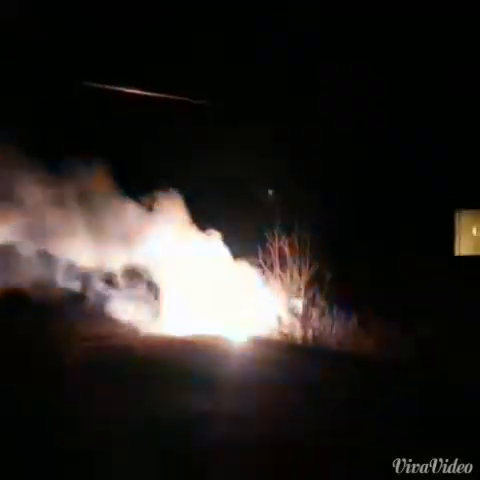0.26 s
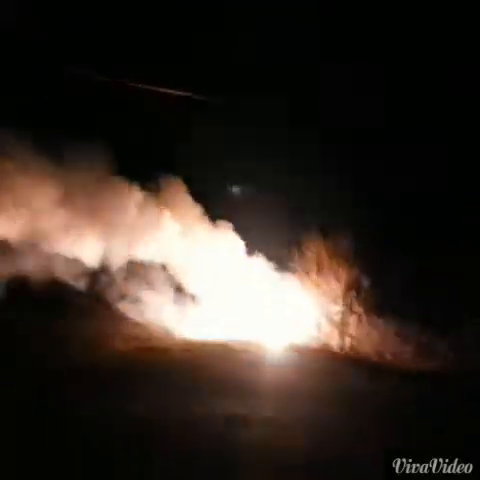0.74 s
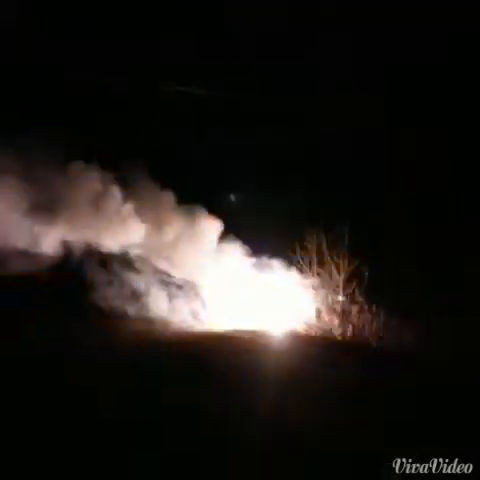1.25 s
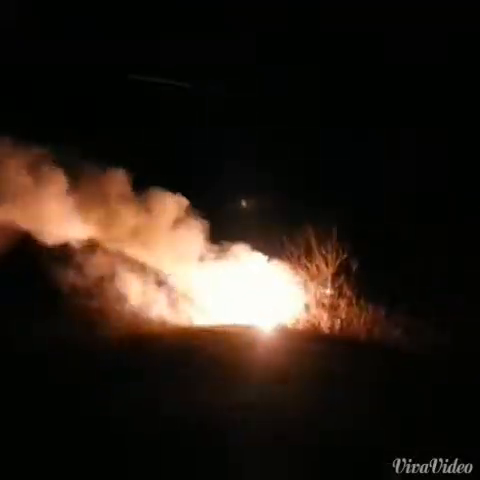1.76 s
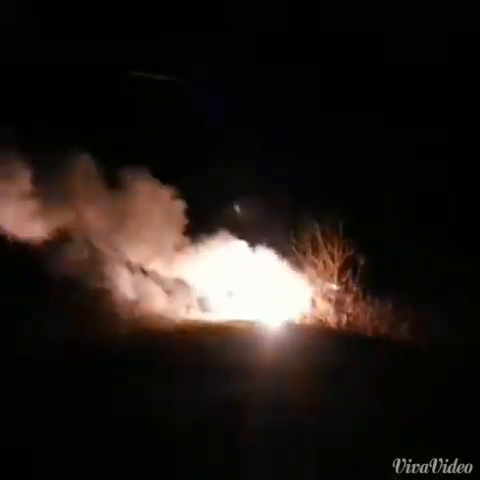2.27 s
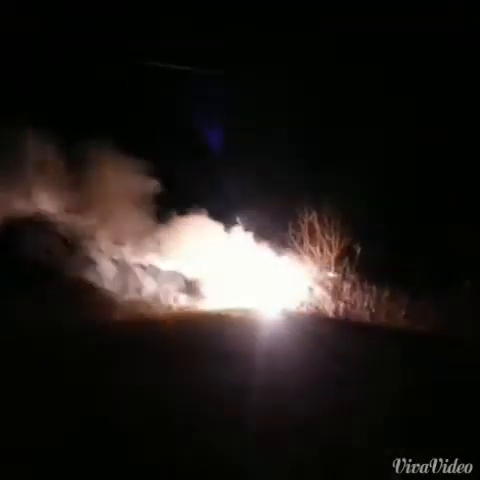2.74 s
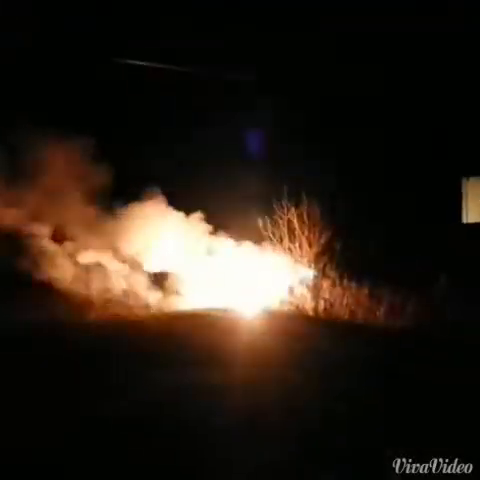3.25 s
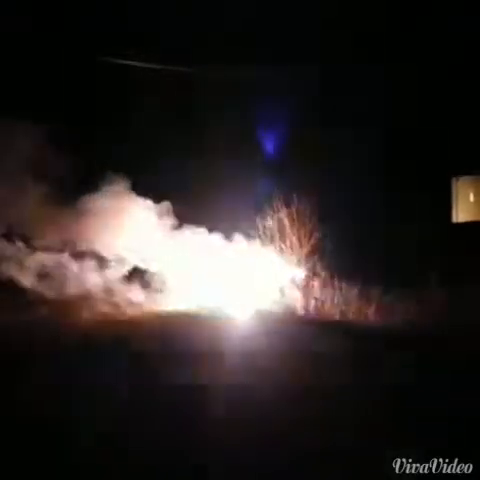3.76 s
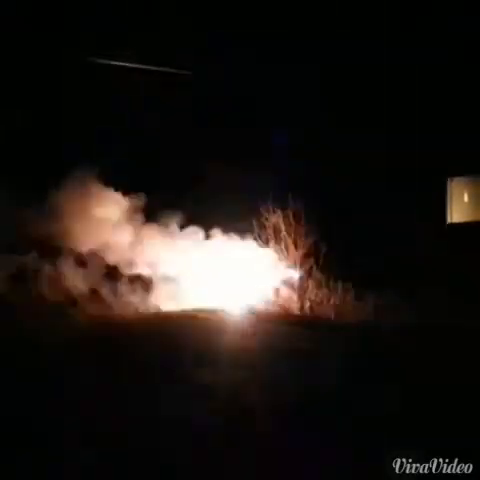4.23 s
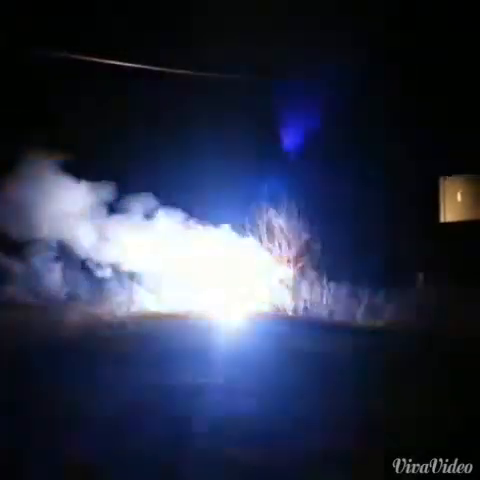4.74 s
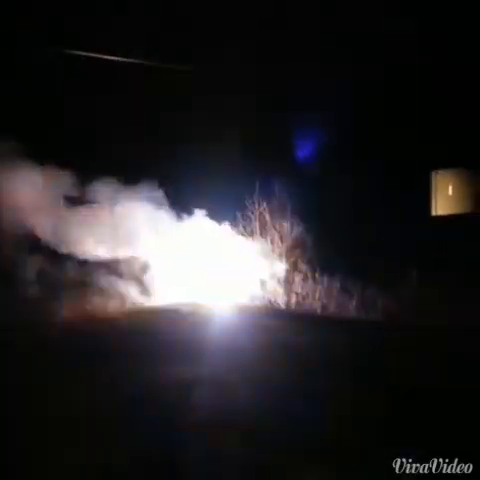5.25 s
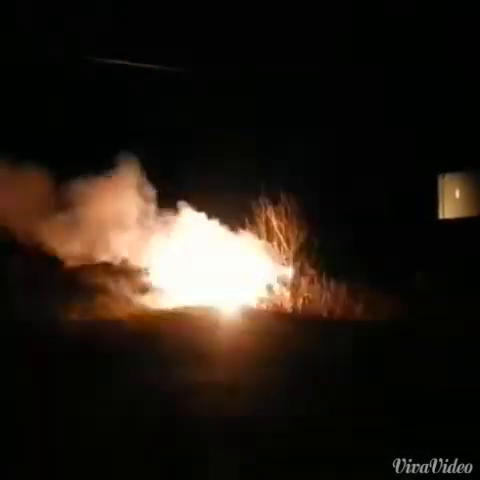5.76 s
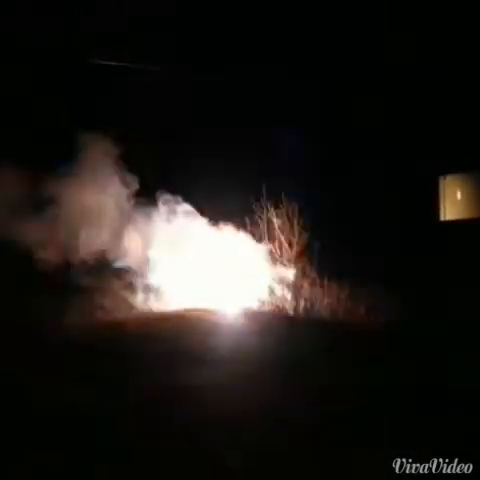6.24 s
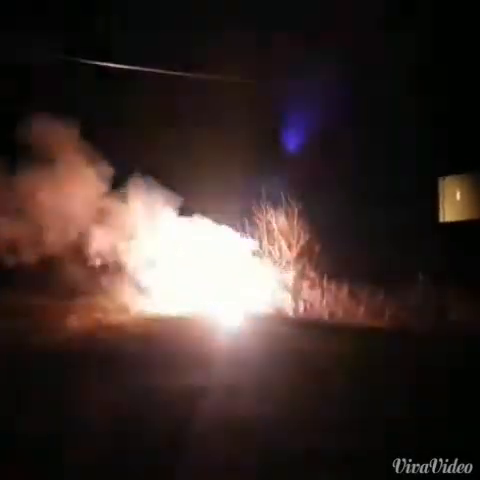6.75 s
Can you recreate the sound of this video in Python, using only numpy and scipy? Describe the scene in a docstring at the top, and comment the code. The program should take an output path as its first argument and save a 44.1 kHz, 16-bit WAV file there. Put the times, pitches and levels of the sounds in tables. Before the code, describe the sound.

Steady low mains buzz and crackling sparks from an arcing power line, with brief finger ticks first and wind buffets late.

```python
"""A fallen power line arcs on the ground outdoors at night, some way from a hand-held stereo camera.
The arc relights on every half cycle of the mains: a deep buzz, a pulsing sizzle and the roar of its flame.
Sparks spit and snap, echoing off ground and brush, over a faint drone and hiss.
Close up, fingers tick and rub on the camera in the first second. Wind rumbles in the microphone
ports, and toward the end gusts buffet the left one."""
import sys
import numpy as np
from scipy import signal
from scipy.fft import rfft, irfft
from scipy.io import wavfile

SR = 44100
rng = np.random.default_rng(int(sys.argv[2]) if len(sys.argv) > 2 else 0)


def materialize(psi):
    """Save the field psi as 16-bit PCM at rate SR to the path in sys.argv[1].

    A 1-D psi becomes a single channel; in a 2-D psi each row is a channel.
    """
    bounded = np.clip(np.atleast_2d(psi).T, -1, 1)
    quanta = np.round(bounded * 32767).astype(np.int16)
    wavfile.write(sys.argv[1], SR, quanta)


N = 308700
TIME = np.arange(N) / SR
MAINS_HZ, FIRST_STRIKE_S = 59.993, .00465
WANDER_HZ = 15  # how fast the arc's levels waver


def amp(db):
    """Decibels to gain."""
    return 10 ** (np.asarray(db) / 20)


def unit(x):
    """Scales to an rms of one."""
    return x / np.sqrt(np.mean(x ** 2) + 1e-20)


def sides(pan_db):
    """Left and right gains for a level difference; positive is to the left."""
    return amp(pan_db * np.array([[.5], [-.5]]))


def levels(table):
    """The dB columns of a curve as gains at every sample."""
    times, *columns = np.transpose(table)
    return np.array([amp(np.interp(TIME, times, db)) for db in columns])


def drift(hz):
    """A random wander of rms one that takes hz new values a second."""
    knots = rng.standard_normal(N // 32)
    return unit(np.interp(TIME * hz, np.arange(len(knots)), knots))


def swell(start, hold, attack, release):
    """An envelope that rises up to its start, holds, and dies away; all in seconds."""
    return np.exp(np.minimum(TIME - start, 0) / attack - np.maximum(TIME - start - hold, 0) / release)


def add(mix, s, sound):
    """Mixes a sound in at s seconds."""
    part = mix[..., max(round(s * SR), 0):][..., :sound.shape[-1]]
    part += sound[..., :part.shape[-1]]


def colour(x, spectrum, size=4096):
    """Minimum-phase filter that follows a curve of (f/Hz, gain/dB) points."""
    hz, db = np.transpose(spectrum)
    log_hz = np.log(np.fft.rfftfreq(size, 1 / SR) + 1)
    cepstrum = irfft(np.log(amp(np.interp(log_hz, np.log(hz), db))))
    cepstrum[1:size // 2] *= 2
    cepstrum[size // 2 + 1:] = 0
    response = irfft(np.exp(rfft(cepstrum)))
    return np.apply_along_axis(signal.oaconvolve, -1, x, response)[..., :N]


def split(x, hz):
    """The parts below and above a frequency."""
    return [signal.sosfilt(signal.butter(4, hz, kind, fs=SR, output="sos"), x)
            for kind in ("low", "high")]


# Strength of the arc, some way off: t/s, then relative level/dB at 120, 240 and 360 Hz
ARC_STRENGTH = [(0, -27, -47, -47), (.45, -26.5, -44.5, -48), (.85, -26, -46, -48.5),
                (1.05, -22.5, -41, -43.5), (1.2, -25, -49, -45), (1.5, -25, -56.5, -49.5),
                (1.62, -26.5, -44.5, -41.5), (1.8, -25.5, -54.5, -45), (2.05, -26.5, -47, -47),
                (2.6, -24.5, -45, -42.5), (3, -23.5, -46, -45.5), (3.12, -25.5, -56.5, -54.5),
                (3.28, -25, -46.5, -42.5), (3.42, -27, -51.5, -51.5), (3.72, -24, -39, -43),
                (4.05, -26, -47.5, -47), (4.8, -25.5, -42, -44), (5.22, -25, -41, -44),
                (5.92, -25.5, -46, -43.5), (6.48, -25.5, -41.5, -42.5), (6.85, -22.5, -38, -39.5),
                (7, -25, -38, -45)]


def arc_strength(sag_db=1, sag_s=0.025, full_crack_db=-33):
    """Gains of the hum, its octave and its twelfth: they wander, and sag after each loud snap."""
    sag = np.zeros(N)
    age = np.arange(SR // 2) / SR / sag_s
    for s, crack_db, *_ in SPARK_SNAPS:
        depth_db = sag_db * min(amp(crack_db - full_crack_db), 1)
        add(sag, s, depth_db * age * np.exp(1 - age))
    hum, octave, twelfth = levels(ARC_STRENGTH) * amp(-sag)
    wander = amp(0.76 * drift(WANDER_HZ))
    return hum * wander, octave * amp(1.1 * drift(WANDER_HZ)), twelfth * wander


# The buzz's other partials at the camera: multiple of the mains, level/dB, left over right/dB
BUZZ_PARTIALS = [(3, -54.5, 5), (5, -63, 0), (8, -56, 2.5), (9, -75.5, 4), (10, -56, 0), (15, -68.5, -1),
                 (22, -71, -13), (26, -71, 23), (60, -81, 1), (62, -80.5, 26)]


def buzz(angle, hum, octave, twelfth, lag_rad=0.063):
    """Each strike heats the air into a pressure pulse; the wandering arc makes its partials waver."""
    port_phase = 0.31 * np.array([[-.5], [.5]])  # the left port trails the right
    octave_phase = 4 * angle + port_phase + 2 * lag_rad + .35 * drift(7.9)
    twelfth_phase = 6 * angle + port_phase + 4 * lag_rad + .15 * drift(10)
    out = amp(-0.5) * hum * np.cos(2 * angle + port_phase) * sides(0.67)
    out += amp(3.5) * octave * np.cos(octave_phase) * sides(2.3)
    out += amp(1.6) * twelfth * np.cos(twelfth_phase) * sides(3.1)
    sharpness = (twelfth / amp(-29)) ** 0.029  # sharper pulses lift the other partials a little
    for order, db, pan_db in BUZZ_PARTIALS:
        # odd multiples arise when the two half cycles burn unequally, which comes and goes
        waver = 0.76 if order % 2 else 0.068
        phase = order * angle + lag_rad * (order - 2)
        partial = (1 + waver * drift(12)) * np.cos(phase) + waver * drift(10) * np.sin(phase)
        out += amp(db) * sharpness * sides(pan_db) * partial
    return -np.sqrt(2) * out


# The flame's low roar as it reaches the camera: f/Hz, relative level/dB
FLAME_SPECTRUM = [(20, -28), (50, -2.5), (80, -28.5), (140, -3.5), (200, -3), (270, 0.5), (380, -3),
                  (480, -12.5), (650, -15), (900, -19.5), (1600, -57), (4000, -65)]


def flame(angle, hum, roar_db=-44, flutter_db=3, throb=.3):
    """The turbulent fireball roars, throbbing with the current."""
    pulsing = 1 + throb * np.cos(2 * angle)  # arc power peaks twice a cycle
    noise = rng.standard_normal((3, N)) * pulsing * amp(flutter_db * drift(14))
    roar = unit(colour(noise[0] + 0.6 * noise[1:], FLAME_SPECTRUM))
    return amp(roar_db) * unit(hum) * roar * sides(0.58)


# The arc's crackle through the left and the right microphone port: f/Hz, gain/dB
LEFT_RESPONSE = [(100, 2), (500, 13), (850, 4.5), (1400, 7.5), (2200, 6), (3000, -5.5), (3800, -21.5),
                 (4400, -9), (5200, 1.5), (6500, -4.5), (8500, -15.5), (10500, -16.5), (12500, -15.5),
                 (15000, -22.5)]
RIGHT_RESPONSE = [(100, -7.5), (500, 8.5), (900, -24), (1500, 0), (2200, -3), (3200, -9), (4200, -11.5),
                  (5200, -10), (6400, -2.5), (8000, -11.5), (10500, -21), (15000, -22.5)]


def ports(x):
    """Each microphone port gives the arc its own colour."""
    return np.array([colour(x[0], LEFT_RESPONSE), colour(x[1], RIGHT_RESPONSE)])


def discharges(grains_per_s=900, grain_gain=0.67, diffuse=1.45, spread_db=3.5):
    """Countless tiny cracks at the ports: partly direct, partly scattered by ground and brush."""
    grains = (rng.random(N) < grains_per_s / SR) * rng.choice([-1, 1], N)
    sizes = amp(spread_db * np.minimum(rng.exponential(1, N), 4.5))
    direct = rng.standard_normal(N) + grain_gain * unit(grains * sizes)
    return ports(direct + diffuse * rng.standard_normal((2, N)))


# Where the line lies, three bands, each as t/s, relative level/dB
FRY_LEVEL = [(0, -42.5), (.5, -45), (.95, -42.5), (2.1, -44.5), (5.2, -45), (6.45, -45), (6.9, -43)]  # low frying of the burning ground
FIZZ_LEVEL = [(0, -45), (.3, -45.5), (.9, -50.5), (1.15, -45.5), (1.4, -47.5), (2.28, -48), (2.52, -52),
              (3.0, -45), (3.28, -50), (3.55, -50.5), (3.67, -47), (3.79, -55), (3.87, -45), (4.04, -48),
              (4.21, -52.5), (4.27, -46.5), (4.35, -51), (4.47, -45), (4.62, -48.5), (4.8, -50),
              (4.88, -47.5), (4.98, -48), (5.35, -51), (5.55, -55), (6.0, -54), (6.15, -51.5),
              (6.45, -56.5), (6.72, -46.5), (7, -49)]  # high sizzle of the discharges
FINE_LEVEL = [(0.0, -59), (0.62, -63), (0.76, -64), (1.65, -63), (2.57, -67), (2.92, -65), (4.33, -65),
              (5.03, -61), (5.28, -67), (5.4, -67), (5.92, -73), (6.47, -67), (6.8, -64), (7.0, -65)]  # their finest hiss


def sizzle(angle, flare_spread_db=3.8, flare_width_rad=.7, between_flares=.45):
    """Discharges crowd into a short flare in each half cycle; some flares burn much harder."""
    half_cycles = angle / np.pi + 1.5
    strike = half_cycles.astype(int)
    size, offset = rng.standard_normal((strike[-1] + 1, 2)).T
    from_peak = np.pi * (half_cycles % 1 - .5) - 0.11 * offset[strike]
    height = amp(flare_spread_db * np.minimum(size, 2)[strike])
    flare = height * np.exp(-.5 * (from_peak / flare_width_rad) ** 2)
    low, high = split(discharges(), 3400)
    fry = unit(low * (1 + .22 * flare) * amp(1.2 * drift(160)))
    # the flares stand out most in the lower treble; the finest hiss burns on between them
    fizz = unit(split(high, 8400)[0] * (between_flares + flare))
    fine = unit(split(discharges(diffuse=2.6), 7700)[1] * (1 + 0.091 * flare))
    fine_gain = levels(FINE_LEVEL) * amp(4.5 + 1.3 * drift(11))
    fry_gain = levels(FRY_LEVEL) * amp(-3.5 + 0.4 * drift(WANDER_HZ))
    fizz_gain = levels(FIZZ_LEVEL) * amp(-5 + 1.1 * drift(WANDER_HZ))
    return fry_gain * fry + fizz_gain * fizz + fine_gain * fine


def drone(hz=102, db=-47):
    """A faint steady drone, pitched just under the hum."""
    return amp(db) * np.sqrt(2) * np.sin(2 * np.pi * hz * TIME + 1.3 * drift(2.78))


# Noise floor of the place and the microphones: f/Hz, relative level/dB
HISS_SPECTRUM = [(100, -27), (600, -8), (1200, 2.5), (2200, -45), (3200, -6.5), (4500, -7.5), (6500, -13),
                 (9000, -15), (12500, -10.5), (15000, -26)]


def hiss(db=-56):
    """Diffuse hiss of the night air and the microphones."""
    return amp(db) * unit(colour(rng.standard_normal((2, N)), HISS_SPECTRUM))


# Wind rumble right on the microphones: f/Hz, relative level/dB
WIND_SPECTRUM = [(15, -42), (50, -3.5), (90, 4.5), (170, 2), (280, -10.5), (450, -22), (700, -29),
                 (1500, -62.5), (4000, -86)]
# Gusts across the ports: t/s, hold/s, left level/dB, right level/dB
PORT_GUSTS = [(0.965, 0.075, -27, -38), (1.604, 0.16, -34, -39), (5.656, 0.048, -30, -29),
              (6.11, 0.065, -26, -48), (6.308, 0.29, -30.5, -49), (6.6, 0.2, -36, -45),
              (6.817, 0.033, -24, -48), (6.96, 0.041, -22, -37)]


def wind(calm_db=-48, breeze_db=-41.5, onset_s=0.99, lumps_db=3):
    """Lumpy turbulence at each port, from a breeze that rises after a calm start and from its gusts."""
    risen = swell(onset_s, hold=N / SR, attack=0.17, release=1)
    breeze_gain = sides(3) * amp(calm_db + (breeze_db - calm_db) * risen)
    gust_power = sum((amp([[left], [right]]) * swell(s, hold, attack=0.04, release=0.1)) ** 2
                     for s, hold, left, right in PORT_GUSTS)
    turbulence = rng.standard_normal((2, 2, N)) * amp(lumps_db * drift(60))
    breeze, gusts = [unit(colour(noise, WIND_SPECTRUM)) for noise in turbulence]
    return breeze_gain * breeze + np.sqrt(gust_power) * gusts


# Spark clusters that stand out of the sizzle, a little to the right: t/s, relative level/dB
SPARK_SPITS = [(1.2512, -41.0), (1.546, -43), (1.6378, -51), (1.7976, -41), (2.1724, -43), (2.1889, -39.5),
               (2.9225, -45.0), (2.9885, -39.0), (3.0387, -45), (3.0558, -43.0), (3.0804, -44.0),
               (3.4227, -41), (3.6226, -40), (3.6563, -42), (3.6727, -41), (3.955, -42), (4.0227, -38),
               (4.0884, -39), (4.1297, -41), (4.4736, -48), (4.489, -40.5), (4.5067, -42), (4.573, -40),
               (4.6054, -43), (4.6223, -43.0), (4.7244, -41), (4.823, -41), (4.8739, -39), (4.8891, -37),
               (4.9224, -46), (5.0073, -43), (5.3889, -43), (6.723, -40.0), (6.7393, -44), (6.7562, -45.0),
               (6.822, -41), (6.8315, -42)]


def spits(faint_share=.3, spread_db=2.5, jitter_s=.0006, attack_s=.0011, release_s=.0017):
    """At some strikes the arc throws a cluster of tiny sparks: a crackle a few milliseconds long."""
    loud = [(s, db + 1) for s, db in SPARK_SPITS]
    # fainter spits fall on random strikes and follow the level of the sizzle
    strikes = FIRST_STRIKE_S + np.arange(2 * MAINS_HZ * N / SR) / (2 * MAINS_HZ)
    size, late = np.clip(rng.standard_normal((len(strikes), 2)), -2, 1.5).T
    faint_db = np.interp(strikes, *np.transpose(FIZZ_LEVEL)) + .5 + spread_db * size
    chosen = rng.random(len(strikes)) < faint_share
    faint = np.column_stack([strikes + jitter_s * late, faint_db])[chosen]
    t = np.arange(-256, 512) / SR
    envelope = np.exp(np.minimum(t, 0) / attack_s - np.maximum(t, 0) / release_s)
    power = np.zeros(N)
    for s, db in loud + list(faint):
        add(power, s + t[0], (amp(db) * envelope) ** 2)
    treble = split(discharges(grains_per_s=2300, grain_gain=1.2), 4200)[1]
    grit = split(treble, 7600)[0]
    return np.sqrt(power) * unit(grit) * sides(-3.5)


# Fingers catching on the case, beside the ports: t/s, knock level/dB, knock f/Hz, ping level/dB
CASE_TICKS = [(0.0108, -34, 1400, -37), (0.057, -44, 1400, -36), (0.0700, -30, 1300, -43),
              (0.1099, -22, 1450, -33), (0.1497, -32, 1350, -47), (0.1665, -34, 1400, -45),
              (0.2113, -35, 1400, -36), (0.2131, -43, 1400, -35), (0.412, -46, 1400, -35),
              (0.428, -42, 1400, -17), (0.431, -39, 1500, -22.5), (0.4715, -48, 1400, -28),
              (0.4832, -48, 1400, -37), (0.5623, -34, 1400, -31.5), (0.5945, -30, 800, -50),
              (0.6523, -24.5, 1200, -47), (0.6846, -32, 1450, -39), (0.6867, -23, 1650, -45),
              (0.6906, -26, 1500, -36), (0.7132, -22.5, 1340, -37), (0.7167, -28, 1420, -45),
              (0.719, -21, 1550, -40)]
# Brittle edge of a tick: f/Hz, relative level/dB
EDGE_SPECTRUM = [(1000, -22), (4000, 4), (7000, 6), (10000, -7), (12000, -7), (14500, -8)]


def ticks(knock_s=.00026, ping_s=.00024, ping_hz=6300, edge_db=-11):
    """Each tick rings the case: a short knock near the left port, a brittle ping near the right."""
    t = np.arange(256) / SR
    knock_shape, ping_shape = [t / rise * np.exp(1 - t / rise) for rise in (knock_s, ping_s)]
    out = np.zeros((2, N))
    for s, knock_db, knock_hz, ping_db in CASE_TICKS:
        edge = unit(colour(rng.standard_normal((2, len(t))), EDGE_SPECTRUM)[:, :len(t)])
        knock = knock_shape * np.sin(2 * np.pi * knock_hz * t)
        ping = ping_shape * (np.sin(2 * np.pi * ping_hz * t) + amp(edge_db) * edge)
        add(out, s, amp(knock_db) * knock * sides(7) + amp(ping_db) * ping * sides(-7))
    return out


# Fingers rubbing on the camera body: t/s, hold/s, relative rasp level/dB, relative fizz level/dB
FINGER_RUBS = [(0.05, 0.12, -44, -51), (0.407, 0.03, -55, -40), (0.472, 0.015, -43, -42.5),
               (0.57, 0.063, -49, -64), (0.656, 0.02, -38, -44.5), (0.678, 0.023, -34, -42.5),
               (0.704, 0.018, -32.5, -46), (0.741, 0.12, -42, -60)]
# The rasp and the fine fizz of skin, close to the microphones: f/Hz, relative level/dB
RASP_SPECTRUM = [(100, -1), (500, 8), (900, 6), (1350, 12), (2000, 5.5), (2900, -6), (4200, -1.5),
                 (6000, -7), (10000, -21), (15000, -19)]
SKIN_FIZZ_SPECTRUM = [(500, -35), (2000, -5), (4000, -3), (7000, -1), (10000, -7.5), (13000, -12),
                      (15000, -17)]


def rubs(attack_s=.002, release_share=.3, grit_db=4):
    """Skin sticks and slips on the case: a gritty rasp to the left, a fine fizz to the right."""
    noise = rng.standard_normal((2, 3, N)) * amp(grit_db * drift(1500))
    rasp, fizz = noise[:, :1] + 3 * noise[:, 1:]  # one part shared, most of it separate at each port
    power = sum((amp([[rasp_db], [fizz_db]]) * swell(s, hold, attack_s, release_share * hold)) ** 2
                for s, hold, rasp_db, fizz_db in FINGER_RUBS)
    rasp_gain, fizz_gain = amp(-3) * np.sqrt(power)
    return (rasp_gain * unit(colour(rasp, RASP_SPECTRUM)) * sides(5.3)
            + fizz_gain * unit(colour(fizz, SKIN_FIZZ_SPECTRUM)) * sides(-6.5))


# A spark's reflections off the ground and the brush: delay t/s, level re direct/dB
GROUND_ECHOES = [(.0038, -16), (.0094, -16.5)]


def with_echoes(direct, t60_s=0.084, spray_db=-9.5):
    """Ground and brush add two faint echoes and a short spray that is unrelated at the two ports."""
    t = np.arange(4096) / SR
    spray = rng.standard_normal((2, len(t))) * amp(-60 * t / t60_s) * (t > .001)
    spray *= amp(spray_db) / np.linalg.norm(spray[0])
    out = direct + signal.oaconvolve(direct, spray, axes=1)[:, :N]
    for delay, db in GROUND_ECHOES:
        add(out, delay, amp(db) * direct)
    return out


# Single sparks out at the line, levels relative:
# t/s, crack level/dB, body f/Hz, ring level/dB, ring f/Hz, left over right/dB
SPARK_SNAPS = [(0.2976, -39.5, 2100, -56, 5500, -5), (0.8022, -39, 1900, -41, 5900, -3),
               (1.0792, -27, 1950, -32.5, 6200, -0.5), (1.1373, -35.5, 2000, -37, 5400, 0),
               (1.7605, -31, 1800, -39, 5200, -1.5), (2.2795, -26, 2200, -24.5, 5060, -2.5),
               (2.3385, -37, 2100, -35, 5500, 1), (2.9046, -41, 1900, -51, 5500, 5),
               (2.938, -30.5, 2050, -41, 5300, -0.5), (3.02, -36.5, 2100, -33, 5900, 0),
               (3.338, -40, 2000, -46, 5300, 3), (3.7383, -34, 1700, -45, 5300, 1),
               (3.903, -41, 2000, -42, 5600, 0), (4.312, -38.5, 2000, -45, 5100, 2),
               (4.954, -25.5, 2240, -22.5, 5500, -3), (5.2802, -41, 2200, -33, 5400, 1),
               (5.2905, -39.5, 2100, -32, 5500, 4), (5.4038, -29.5, 2130, -28.5, 4900, -2.5),
               (5.4404, -40, 2200, -42, 5600, -3), (5.5974, -41, 1500, -53, 6000, 3),
               (5.8627, -34, 1750, -33.5, 4970, 0.5), (6.22, -40, 1300, -60, 5100, -1),
               (6.381, -42, 2000, -45, 5900, 2), (6.63, -39.5, 2000, -49, 5400, 3),
               (6.8546, -40.5, 1900, -52, 5600, 2), (6.9463, -36, 1890, -46, 5300, 7)]
# The dry crack before the ports colour it: f/Hz, gain/dB
CRACK_SPECTRUM = [(60, -25), (300, 0), (800, -14), (1500, -8), (2500, 1), (4000, 2.5), (8000, -30.5),
                  (15000, 0)]


def snaps(body_s=.00022, ring_s=.00014, sputter_s=.001):
    """A spark is a dry crack with a short mid-range body and a bright, brief ring that sputters out."""
    t = np.arange(512) / SR
    shock = signal.unit_impulse(len(t))
    crack = -colour(shock, CRACK_SPECTRUM)[:len(t)]
    cracks, rings = np.zeros((2, 2, N))
    for s, crack_db, body_hz, ring_db, ring_hz, pan_db in SPARK_SNAPS:
        body = -np.exp(-t / body_s) * np.cos(2 * np.pi * body_hz * t)
        mode = np.exp(-t / ring_s) * np.cos(2 * np.pi * ring_hz * t) + 0.79 * shock
        sputter = .11 * rng.standard_normal(len(t)) * np.exp(-t / sputter_s)
        ring = np.convolve(shock + sputter, mode)[:len(t)]
        add(cracks, s, amp(crack_db) * (amp(27) * crack + amp(8.5) * body) * sides(pan_db))
        add(rings, s, amp(ring_db + 23.5) * ring / np.linalg.norm(ring) * sides(pan_db))
    return with_echoes(ports(cracks + split(rings, 4300)[1]))


# Eddies striking the left microphone port: t/s, level/dB, half width/s
PORT_EDDIES = [(0.941, -15.5, 0.0015), (1.08, -34, .0007), (5.596, -20, 0.0016), (5.663, -25, 0.0018),
               (5.687, -16, 0.0012), (5.737, -19, 0.0014), (6.0707, -12, 0.0015), (6.0786, -1.5, 0.0014),
               (6.1361, -14, 0.0011), (6.1445, -15, 0.0014), (6.1662, -15, 0.0018), (6.1863, -7.5, 0.0016),
               (6.205, -17, 0.0013), (6.2155, -17, 0.0011), (6.3022, -12.5, 0.0011), (6.3112, -18, 0.0024),
               (6.351, -23, 0.00085), (6.383, -14, 0.0011), (6.399, -19, 0.0019), (6.4528, -12.5, 0.0015),
               (6.47, -19, .0015), (6.4824, -13, .0014), (6.809, -24, 0.0017), (6.952, -1.5, 0.0014),
               (6.958, -11, 0.00093), (6.9679, -6.5, 0.00099), (6.979, -15, 0.0028)]


def buffets(lead=0.31, rebound=0.88):
    """An eddy sucks at the left port: the pressure builds a little, drops steeply and rebounds."""
    t = np.arange(-1024, 1024) / SR
    out = np.zeros((2, N))
    for s, db, width in PORT_EDDIES:
        u = t / width
        before, after = np.exp(-np.array([(u + 1.8) / 1.6, (u - 2.1) / 1.2]) ** 2)
        stretch = np.where(u < 0, .75, 1.15)  # falls faster than it recovers
        drop = 1.15 * (1 + 1.3 * (u / stretch) ** 2) ** -1.3
        add(out[0], s + t[0], amp(db) * (lead * before - drop + rebound * after))
    return out


def scene():
    """The arc some way off, pulsing with the mains; fingers and wind on the camera; the background."""
    angle = 2 * np.pi * MAINS_HZ * (TIME - FIRST_STRIKE_S) + 0.02 * drift(14)
    hum, octave, twelfth = arc_strength()
    arc = buzz(angle, hum, octave, twelfth) + flame(angle, hum) + sizzle(angle) + snaps() + spits()
    return arc + rubs() + ticks() + wind() + buffets() + drone() + hiss()


def record(dry, cutoff_hz=14650):
    """The camera's band limit."""
    lowpass = signal.firwin(301, cutoff_hz, window=("kaiser", 8), fs=SR)
    return signal.oaconvolve(dry, lowpass[None], "same", axes=1)


dry = scene()
out = record(dry)
materialize(out)
```